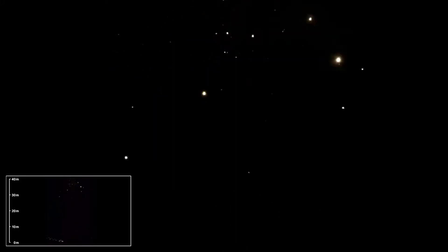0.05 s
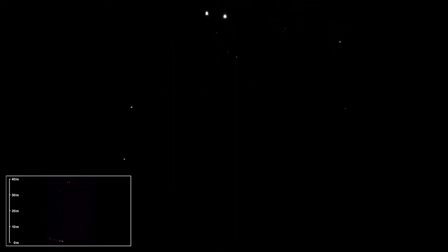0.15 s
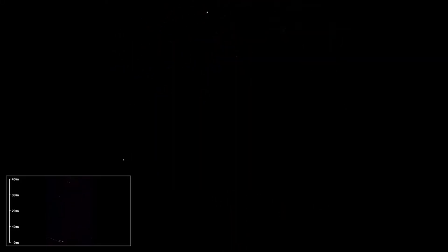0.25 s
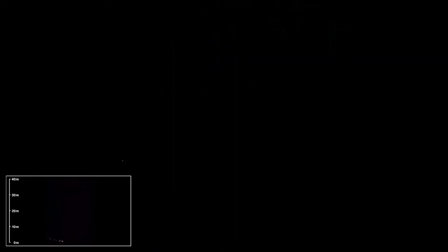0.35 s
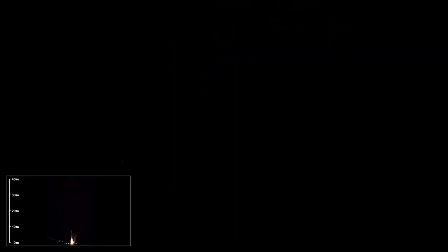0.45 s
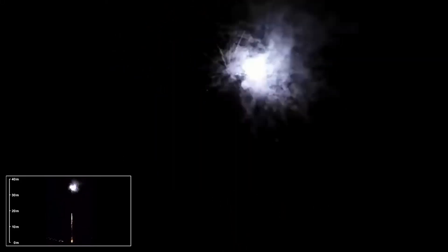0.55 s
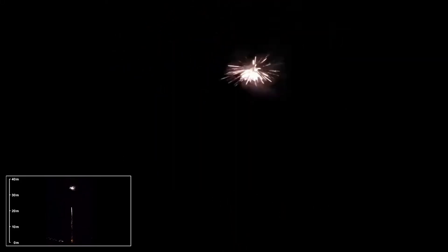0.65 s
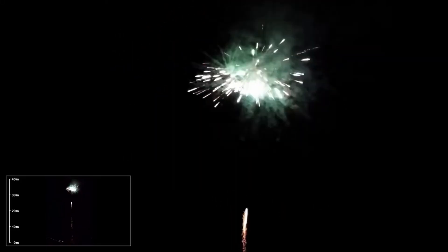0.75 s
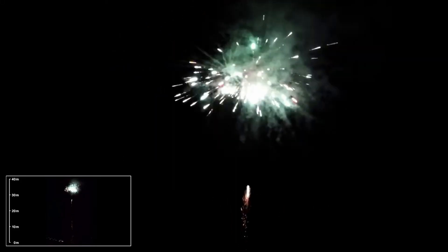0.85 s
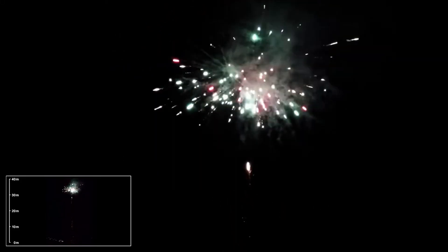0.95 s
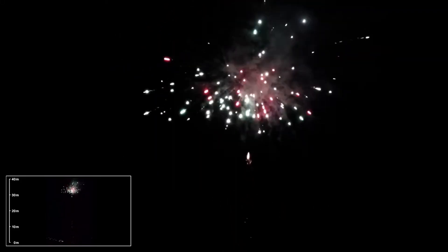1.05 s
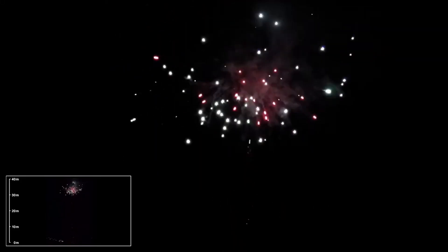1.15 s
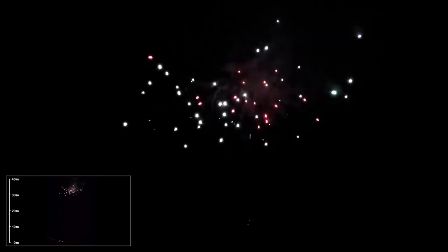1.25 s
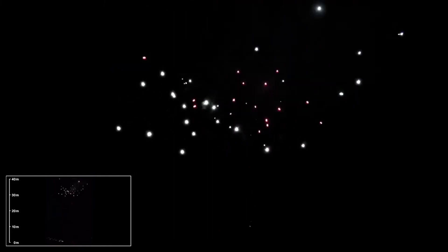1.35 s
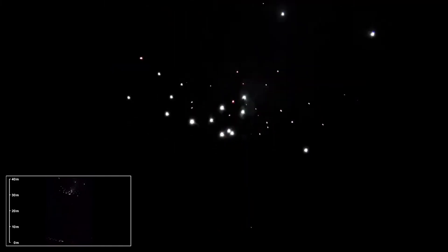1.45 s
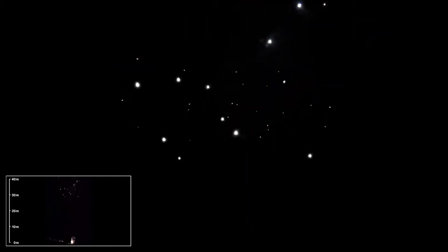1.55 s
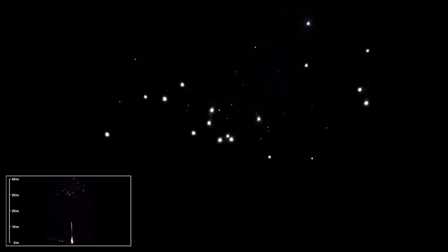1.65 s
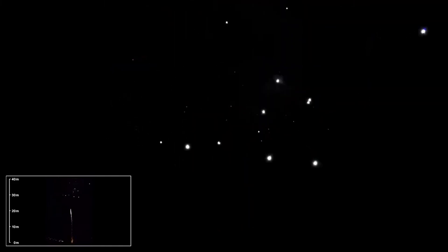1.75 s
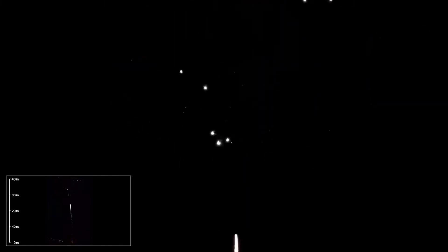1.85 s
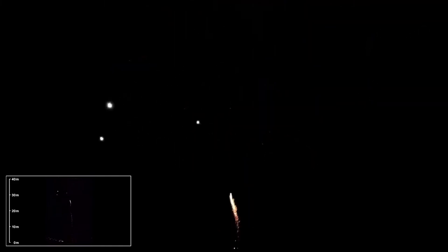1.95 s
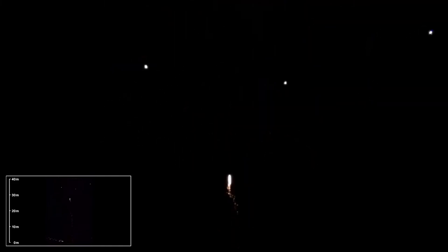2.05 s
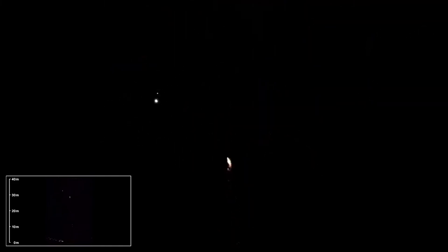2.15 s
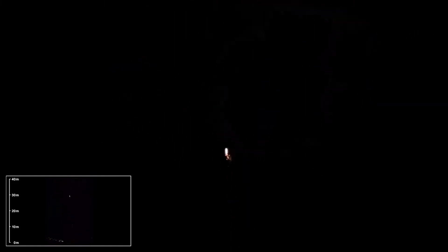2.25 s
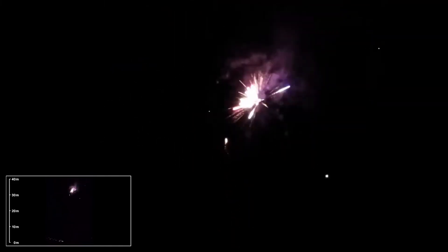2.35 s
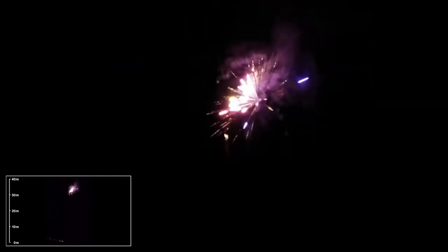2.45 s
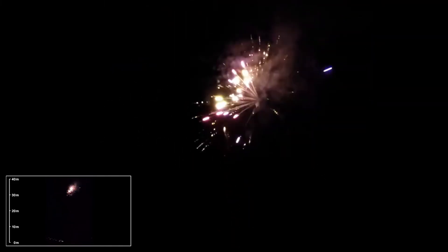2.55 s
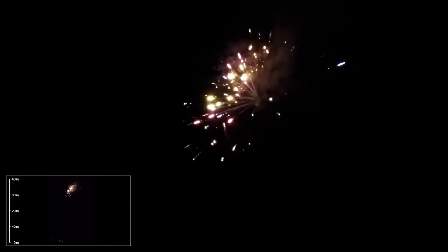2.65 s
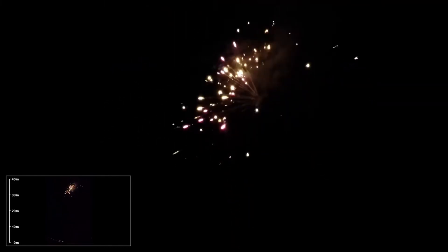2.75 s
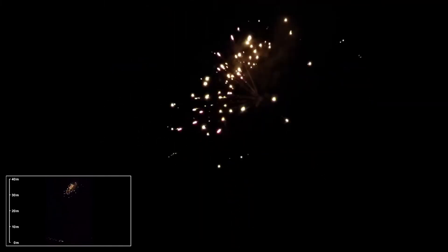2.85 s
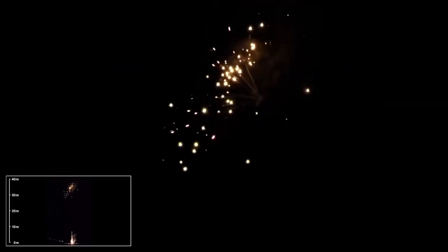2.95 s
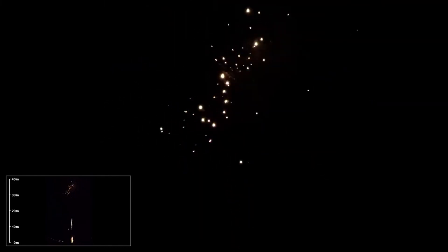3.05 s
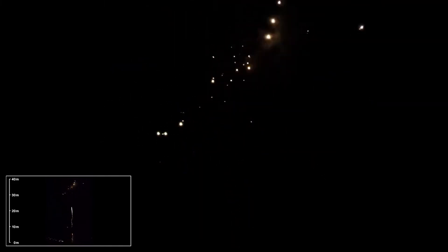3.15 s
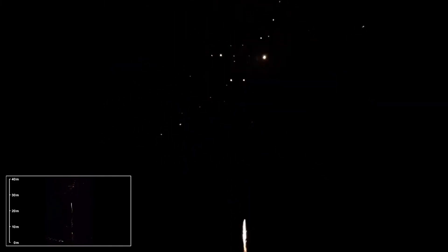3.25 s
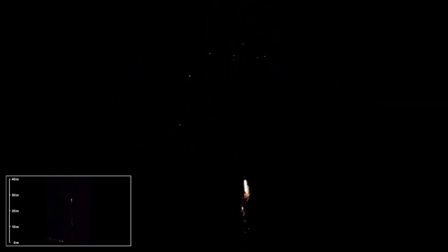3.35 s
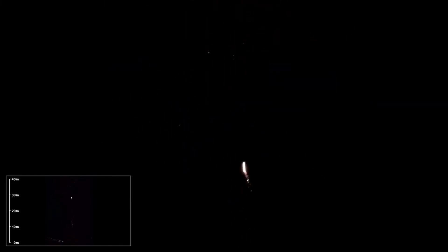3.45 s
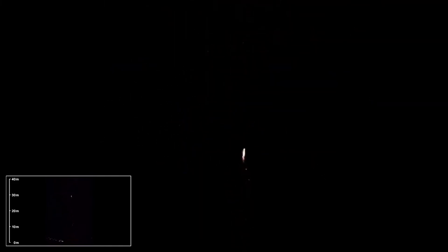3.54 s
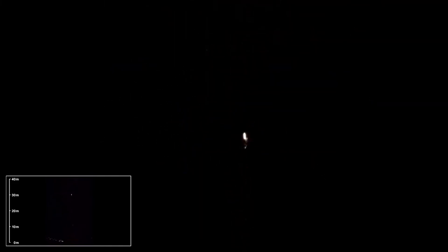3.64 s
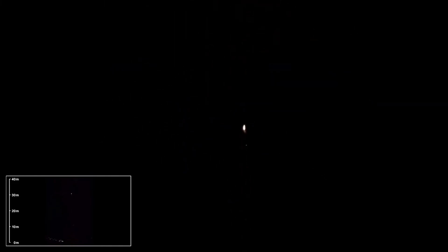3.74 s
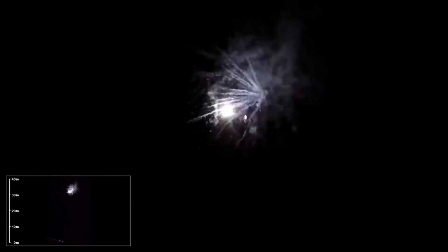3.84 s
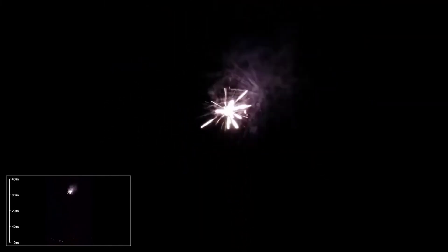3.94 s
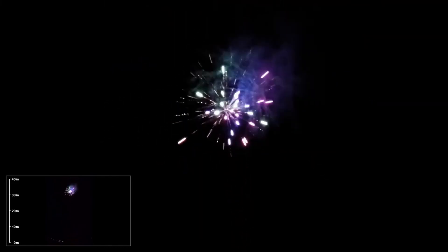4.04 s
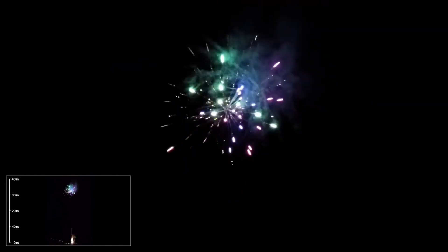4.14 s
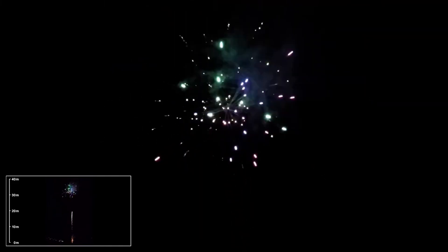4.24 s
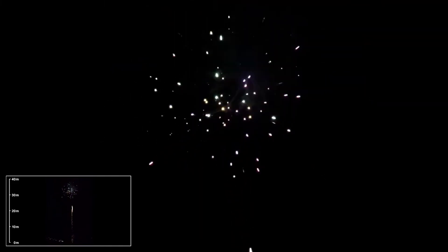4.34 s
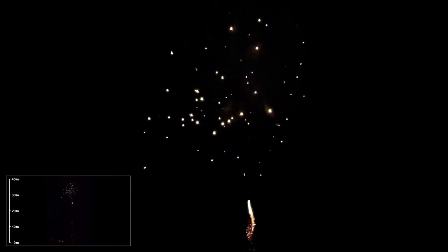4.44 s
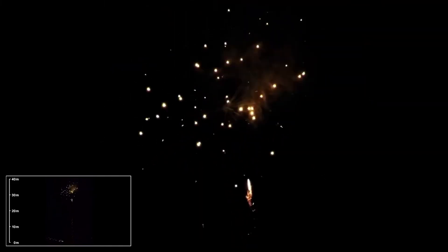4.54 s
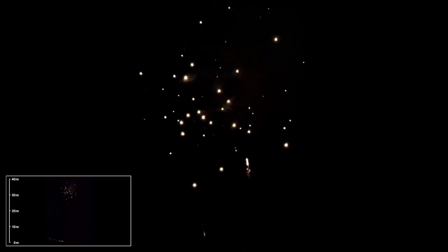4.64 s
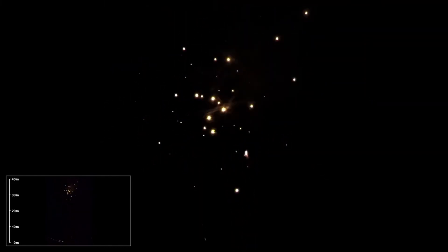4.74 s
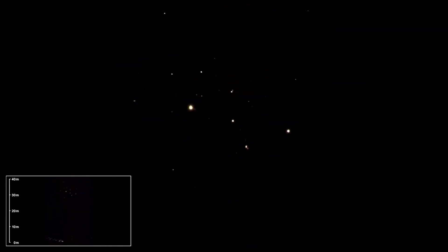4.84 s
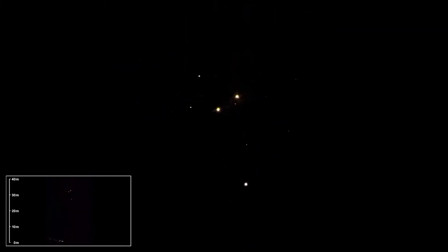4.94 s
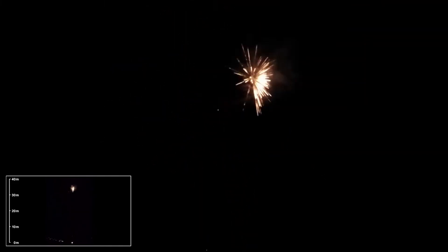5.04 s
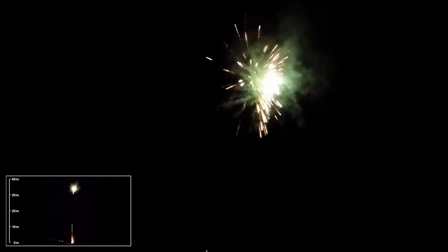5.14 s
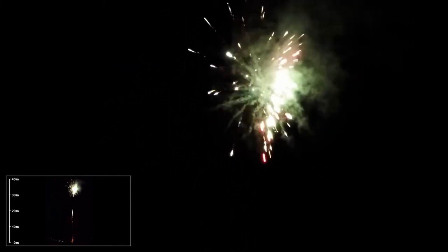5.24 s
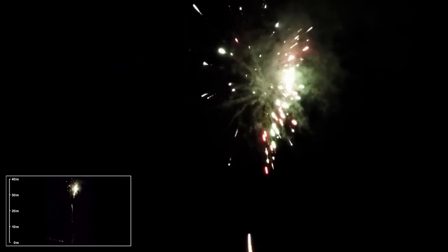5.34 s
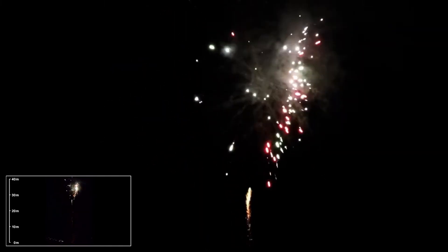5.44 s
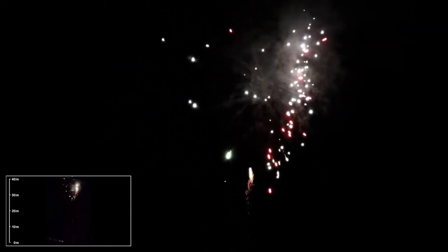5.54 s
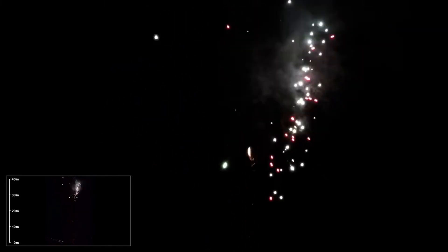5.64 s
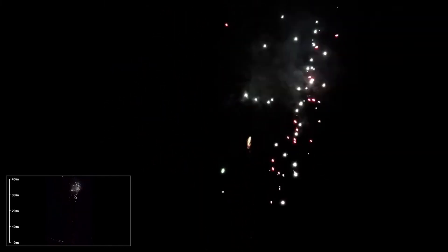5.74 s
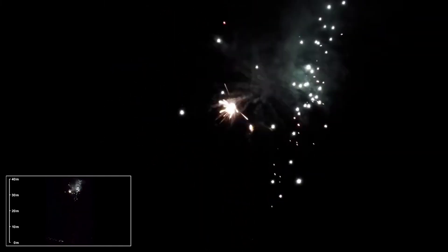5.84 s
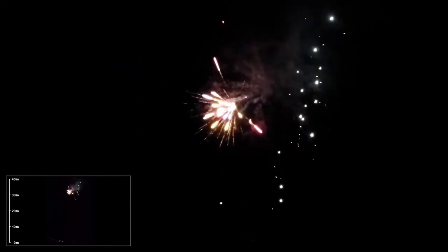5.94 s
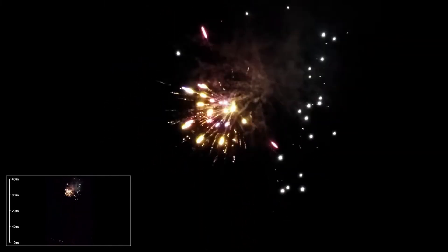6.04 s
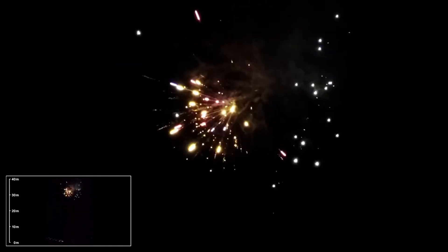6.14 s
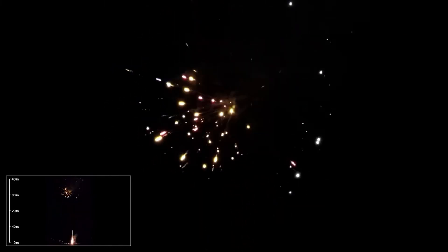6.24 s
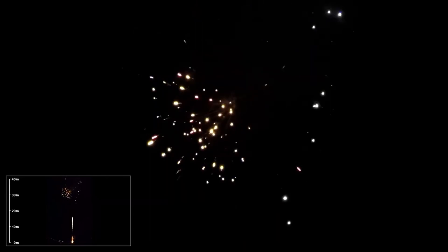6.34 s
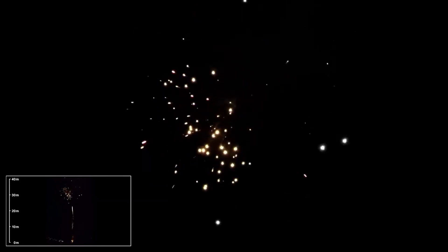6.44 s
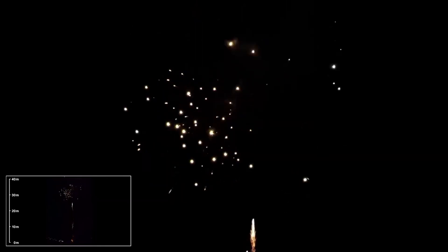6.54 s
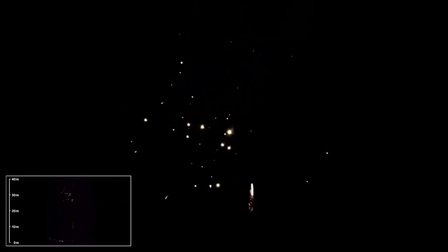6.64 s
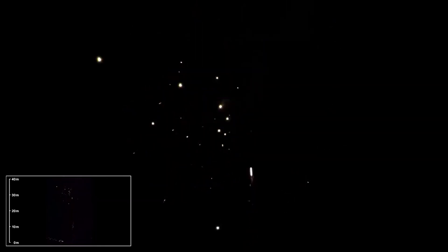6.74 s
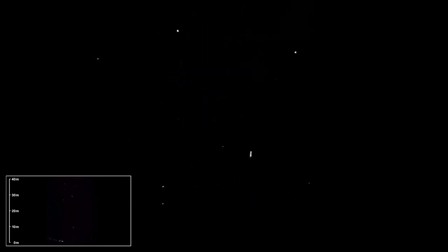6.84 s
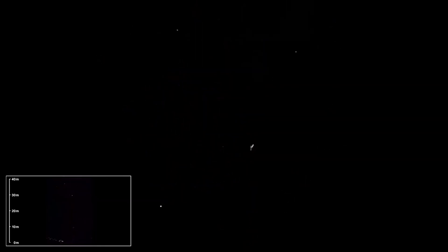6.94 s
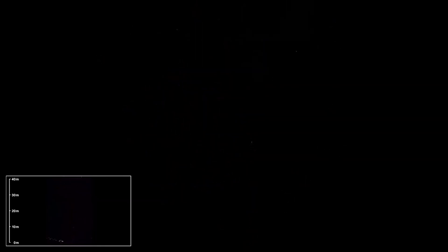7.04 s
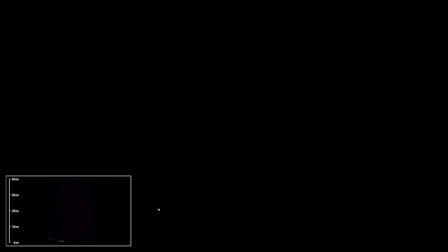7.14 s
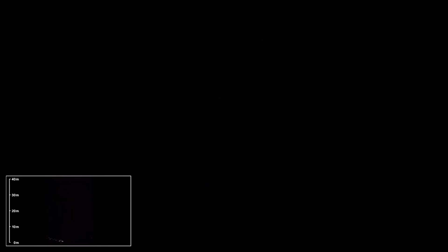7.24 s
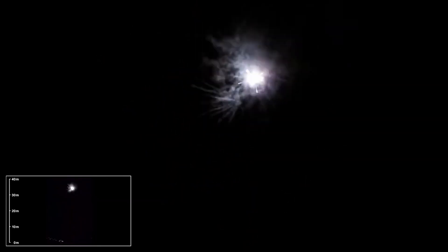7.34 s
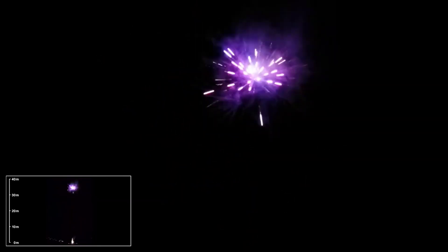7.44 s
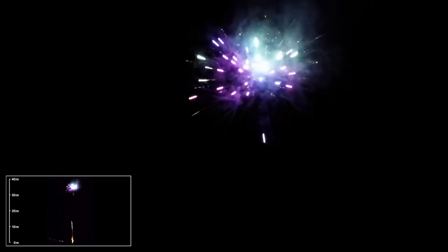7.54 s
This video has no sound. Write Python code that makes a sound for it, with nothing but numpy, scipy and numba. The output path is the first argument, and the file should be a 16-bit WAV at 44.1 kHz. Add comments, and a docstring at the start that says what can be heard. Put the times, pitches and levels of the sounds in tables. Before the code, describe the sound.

Rolling reverberation from an earlier burst is already dying away when a launch charge bangs, followed shortly by a shell cracking in the sky. More abrupt, distorted shots and bursts follow at irregular gaps, with dull thudding echoes and grainy crackling tails. After a short lull, a tight double bang ends it, outdoors over quiet night hiss.

```python
"""A multi-shot firework battery at night, some tens of metres from the microphone on open ground.
Lift charges bang in the tubes and shells burst overhead: a shock front, a suction and a rebound each.
Walls and trees return single echoes (filtered clicks and noise bursts) and a long rolling wash
(octaves of decaying noise), over a faint night hiss.
The blasts overload the microphone, and a gain control ducks after the bangs."""
import sys
import numpy as np
from scipy import signal
from scipy.fft import rfft, irfft, next_fast_len
from scipy.io import wavfile
from scipy.ndimage import uniform_filter1d
from numba import njit

SR = 44100
rng = np.random.default_rng(int(sys.argv[2]) if len(sys.argv) > 2 else 0)


def invert_db(level):
    """Linear amplitude ratio for a level in decibels (20 dB per decade), elementwise."""
    return 10 ** (np.asarray(level, dtype=float) / 20)


def put_to_file(sound):
    """Save the sound as 16-bit audio at rate SR, in the file named by the first command-line argument."""
    columns = np.atleast_2d(sound).T  # one column per channel
    safe = np.clip(columns, -1, 1)
    whole_steps = np.round(safe * 32767)
    wavfile.write(sys.argv[1], SR, whole_steps.astype(np.int16))


N = 334719

# lift charges in the tubes:
# (time [s], end of suction [ms], rebound level [dB], drive of the surroundings [dB])
LIFT_SHOTS = [(.5005, 3.7, 8.5, 3.5), (1.657, 4.3, 1, 3), (3.0301, 4.6, -7, -1.8), (4.1743, 6.2, -5, -3),
              (5.157, 4.7, -6, 0), (6.3068, 6.0, -6, -1.3), (7.5407, 6.0, -5, 2)]
# shell bursts, each at its own spot in the sky, so the walls answer early or late:
# (time [s], end of suction [ms], rebound level [dB], drive of the surroundings [dB],
#  near wall late by [ms], far walls late by [ms])
BURST_SHOTS = [(-.656, 5.0, 1, 1, 0, -6), (.7875, 5.6, -7, -.7, 0, -7), (2.4667, 5.0, 3, 7, -1, 1),
               (4.0686, 5.0, 1, -2, -3, 0), (5.1732, 5.4, -5, -1.4, 3, -6), (6.0055, 5.0, 1, 5, 0, 2),
               (7.5301, 5.2, -1, 0, 0, 0)]
# swings of the shock front and its ground reflection:
# (frequency [Hz], first peak [ms], strongest at [ms], length [ms], overpressure [re swing])
LIFT_SWINGS = (745, .08, 1.5, 1.65, .35)
BURST_SWINGS = (760, .22, 2.0, 1.7, .08)
# size of a blast: (front level [dB], rebound length after a 5 ms suction [ms])
LIFT_SIZE = (12, 10.5)
BURST_SIZE = (9, 7.7)
# ringing left after the front: (frequency [Hz], level re front [dB], t60 [s])
FRONT_RING = [(503, -20, 0.056), (745, -21, 0.04), (1210, -7, 0.0083), (2700, -13, 0.0038),
              (9500, -11.5, 0.0018)]
# fixed reflectors around the tubes, and the walls and tree lines that return the bursts:
# (delay [ms], level [dB], low edge [Hz], high edge [Hz], spread [ms])
TUBE_REFLECTORS = [(55.5, -16, 2600, 13000, 1.3), (78, -21, 2600, 6500, 1.1), (93, -21, 2600, 6000, 1.1),
                   (107, -12, 1150, 2600, 3.5), (107.5, -24, 2700, 6000, 1.2), (132, -20, 2300, 6000, 2.4),
                   (200, -29, 1600, 9000, 1.1), (217, -25, 1000, 4000, 5.5), (218, -21, 7000, 13000, 1.5),
                   (232, -21, 2200, 9000, 2), (234.2, -9.5, 70, 1050, .4), (234.2, -11, 60, 400, .4),
                   (246, -21, 310, 3000, 5.5), (313, -23, 1200, 6000, 2.4), (367, -27, 2600, 10000, 3.5),
                   (382, -19, 70, 900, 7), (442, -29, 1600, 6000, 3.5), (580, -32, 2100, 6000, 2.4),
                   (606, -28, 1200, 5000, 2.4)]
NEAR_REFLECTORS = [(84, 7, 62, 1900, 8), (89, -2, 2200, 8000, 1.2)]
FAR_REFLECTORS = [(160, 12, 62, 2500, 6), (186, 11, 62, 1800, 6), (211, 4, 62, 4500, 8),
                  (290, 2, 62, 1800, 7), (340, 1, 62, 4000, 6), (425, 0, 62, 2300, 3.2),
                  (451, -4, 62, 1800, 5)]
FARTHEST_REFLECTOR = [(771, -2, 62, 1600, 6.5)]
# zones of scatterers that feed the wash, then the wash of the volley fired before:
# (first arrival [s], swell [s], peak level [dB], t60 [s], treble lift [dB])
LIFT_ZONES = [(0, 0.0044, -19, .13, 12), (.03, .02, -40.5, 0.65, 11.5), (.22, .05, -35, 1.1, 8),
              (.4, 0.84, -30.5, 3.8, -0.5)]
BURST_ZONES = [(0, .004, -19, .26, 6), (.075, .07, -24, 1.2, -2), (.095, .09, -38, 1.3, 14),
               (.76, .2, -41, 4, 4)]
EARLIER_ZONE = (-0.2655, 0.79, -22, 2, -1)
# relative spectrum set by ground and microphone: (frequency [Hz], level per Hz [dB])
GROUND_AND_MIC = [(15, -18), (80, -11), (250, -7), (400, -6), (700, -2), (860, -6), (1250, -21),
                  (2000, -31), (2600, -32), (3700, -30), (5000, -35), (8000, -44), (11000, -42),
                  (15000, -54), (16500, -100.5)]

REBOUND_MS_PER_MS = 3.3  # a longer suction rebounds more slowly
LIFT_CLICK_DB = 20.5  # energy that a lift charge sends to the reflectors
FARTHEST_DB_PER_MS = -.8  # the farthest wall is reached best by bursts that lean toward the far walls
NEAR_DB_PER_REBOUND_DB = .5  # a blast that rebounds hard also fills the ground close by
AIR_DB_PER_S = 20  # extra loss at 8 kHz for each second of path
NIGHT_DB, HISS_DB = -41, -43.5  # before the colour of ground and microphone; night falls toward the treble
LOW_PASS_HZ = 16300  # edge of the low-pass after the clipping


def band(x, low_hz, high_hz):
    """Gentle band-pass."""
    edges_hz = [low_hz, min(high_hz, .45 * SR)]
    return signal.sosfilt(signal.butter(3, edges_hz, "band", fs=SR, output="sos"), x)


def add(out, time_s, sound):
    """Mix a sound in at a time; one that starts outside the scene is left out."""
    i = int(round(time_s * SR))
    if 0 <= i < N:
        out[i:i + len(sound)] += sound[:N - i]


def walk(rate_hz):
    """Random levels that glide from one to the next, a new one every 1 / rate_hz seconds."""
    hold = int(SR / rate_hz)
    steps = np.repeat(rng.standard_normal(N // hold + 1), hold)
    return 0.91 * uniform_filter1d(steps, hold)[:N]


def zone_db(since, arrival_s, swell_s, peak_db, t60_s):
    """Level of one zone of scatterers: it swells after the first arrival, then dies away evenly in dB."""
    rise = np.clip((since - arrival_s) / swell_s, 1e-4, 1)
    decay_s = np.maximum(since - arrival_s - swell_s, 0)
    return peak_db + 20 * np.log10(rise) - 60 * decay_s / t60_s


def wash_power(t, hz):
    """Power of one octave: night floor and scattered blasts add up, the treble dying sooner in the air."""
    treble_share = np.clip(np.log2(hz / 700) / 1.6, 0, 1)
    air_db_per_s = AIR_DB_PER_S * (hz / 8000) ** 1.045
    *shape, treble_db = EARLIER_ZONE
    earlier_db = zone_db(t, *shape) + treble_share * treble_db - air_db_per_s * (t + 0.6)
    power = invert_db(NIGHT_DB - 110 * (hz / 8000)) ** 2 + invert_db(earlier_db) ** 2
    for shots, zones in ((LIFT_SHOTS, LIFT_ZONES), (BURST_SHOTS, BURST_ZONES)):
        for time_s, _, rebound_db, drive_db, *_ in shots:
            since = t - time_s
            # the close ground follows the rebound, the distance follows the drive
            far = np.clip(since / .09, 0, 1)
            send_db = far * drive_db + (1 - far) * NEAR_DB_PER_REBOUND_DB * rebound_db
            for *shape, treble_db in zones:
                db = send_db + zone_db(since, *shape) + treble_share * treble_db - air_db_per_s * since
                power = power + (t > time_s + shape[0]) * invert_db(np.minimum(db, 0)) ** 2
    return power


def wash():
    """Countless small reflections heard as noise, each octave with its own level and flicker."""
    step, size = 64, next_fast_len(N)
    t = np.arange(0, N + step, step) / SR
    # scattered strong reflections roughen the noise
    noise = rng.standard_normal(N) * invert_db(2.24 * rng.exponential(size=N))
    spectrum = rfft(noise / noise.std(), size)
    octave = np.log2(np.maximum(np.linspace(0, SR / 2, len(spectrum)), 1))
    out, surge = 0, walk(70)
    for hz in 31.25 * 2. ** np.arange(10):
        weight = np.clip(1 - abs(octave - np.log2(hz)), 0, 1)
        octave_noise = irfft(spectrum * weight, size)[:N]
        # the bass surges in lumps, the treble crackles in quick grains
        treble_share = np.clip(np.log2(hz / 700) / 1.6, 0, 1)
        flicker_db = 1.44 * walk(25) + (2.4 - 0.96 * treble_share) * surge + 2.1 * treble_share * walk(240)
        level = np.interp(np.arange(N) / SR, t, np.sqrt(wash_power(t, hz)))
        out = out + octave_noise * invert_db(flicker_db) * level
    return out


def hiss():
    """Even night hiss: steady band-passed noise."""
    return invert_db(HISS_DB) * band(rng.standard_normal(N), 1700, 4200)


def echo(db, low_hz, high_hz, spread_ms):
    """One click from a flat wall; a rough surface smears it into a burst that swells and dies."""
    ms = 1000 * np.arange(SR // 15) / SR
    swell = np.sqrt(ms / spread_ms) * np.exp(-ms / spread_ms)
    burst = rng.standard_normal(len(ms)) * swell * min(spread_ms / 3, 1)
    burst[0] = 1  # the click
    return invert_db(db) * band(burst / np.linalg.norm(burst), low_hz, high_hz)


def echoes():
    """The tubes stand still, so lifts share one pattern; bursts shift theirs with their place in the sky."""
    out, pattern = np.zeros(N), np.zeros(N)
    for delay_ms, db, low_hz, high_hz, spread_ms in TUBE_REFLECTORS:
        add(pattern, delay_ms / 1000, echo(db, low_hz, high_hz, spread_ms))
    for time_s, *_, drive_db in LIFT_SHOTS:
        add(out, time_s, invert_db(LIFT_CLICK_DB + drive_db) * pattern)
    for time_s, _, _, drive_db, near_ms, far_ms in BURST_SHOTS:
        answers = ((near_ms, drive_db, NEAR_REFLECTORS), (far_ms, drive_db, FAR_REFLECTORS),
                   (0, FARTHEST_DB_PER_MS * far_ms, FARTHEST_REFLECTOR))
        for late_ms, gain_db, walls in answers:
            for delay_ms, db, low_hz, high_hz, spread_ms in walls:
                sound = echo(db + gain_db, low_hz, high_hz, spread_ms)
                add(out, time_s + (delay_ms + late_ms) / 1000, sound)
    return out


def colour(x):
    """Ground and microphone as a causal filter, from the cepstrum of the log gain; unit power on white noise."""
    hz, db = np.transpose(GROUND_AND_MIC)
    gain_db = np.interp(np.log(np.linspace(1, SR / 2, 2049)), np.log(hz), db)
    cepstrum = irfft(np.log(invert_db(gain_db)))
    # folding the cepstrum forward gives minimum phase
    cepstrum[1:2048] *= 2
    cepstrum[2049:] = 0
    response = irfft(np.exp(rfft(cepstrum)))
    return signal.fftconvolve(x, response / np.linalg.norm(response))[:len(x)]


def blast(swings, front_db, usual_rebound_ms, suction_ms, rebound_db):
    """Shock front with its ground reflection, a suction phase, then a rebound that sags slowly below rest."""
    ms = 1000 * np.arange(SR // 10) / SR
    front_hz, peak_ms, middle_ms, length_ms, overpressure = swings
    front = np.cos(2 * np.pi * front_hz * (ms - peak_ms) / 1000)
    front *= np.exp(-((ms - middle_ms) / length_ms) ** 2)
    # the pressure stays high in the middle of the front, widening its second crest
    front += overpressure * np.exp(-((ms - 1.45) / .6) ** 2)
    ring = sum(invert_db(db) * np.cos(2 * np.pi * hz * ms / 1000) * 1000. ** (-ms / 1000 / t60)
               for hz, db, t60 in FRONT_RING)
    onset = np.minimum(ms / peak_ms, 1)
    suction = .35 * suction_ms * np.exp(-((ms - .78 * suction_ms) / (.23 * suction_ms)) ** 2)
    rebound_ms = usual_rebound_ms + REBOUND_MS_PER_MS * (suction_ms - 5)
    since = np.maximum(ms - suction_ms, 0)
    swing_back = np.cos(np.pi / 2 * (since / rebound_ms) ** .9)
    rebound = (1 - np.exp(-since / .7)) * swing_back * np.exp(-since / rebound_ms / 1.55)
    return invert_db(front_db) * (front + ring) * onset - suction + invert_db(rebound_db) * rebound


def scene():
    """Direct blasts over their echoes, the wash and the night hiss, as one channel."""
    out = colour(wash() + hiss() + echoes())
    for shots, swings, size in ((LIFT_SHOTS, LIFT_SWINGS, LIFT_SIZE), (BURST_SHOTS, BURST_SWINGS, BURST_SIZE)):
        for time_s, suction_ms, rebound_db, *_ in shots:
            add(out, time_s, blast(swings, *size, suction_ms, rebound_db))
    return out[None]


@njit
def follow(x, attack, release):
    """Level follower, quick up and slow down; attack and release are shares of the gap closed per sample."""
    out, level = np.empty(len(x)), 0.
    for i in range(len(x)):
        level += (abs(x[i]) - level) * (attack if abs(x[i]) > level else release)
        out[i] = level
    return out


def band_limit(x):
    """A steep low-pass at the top of the band."""
    return signal.sosfilt(signal.butter(12, 16440, fs=SR, output="sos"), x)


def record(dry):
    """Gain control pulls down after each bang, too late for the front, which clips; a low-pass follows."""
    attack_s, release_s, late_s = .017, .17, .013
    level = follow(np.clip(dry[0], -1, 1), 1 / (attack_s * SR), 1 / (release_s * SR))
    gain = np.minimum(1, (0.076 / (level + 1e-9)) ** 0.54)
    late = int(late_s * SR)
    late_gain = np.r_[np.ones(late), gain[:-late]]
    clipped = np.clip(dry * late_gain, -1, 1)
    low_pass = signal.ellip(6, .1, 50, LOW_PASS_HZ, fs=SR, output="sos")
    finished = signal.sosfiltfilt(low_pass, clipped)
    return band_limit(finished)


dry = scene()
out = record(dry)
put_to_file(out)
```